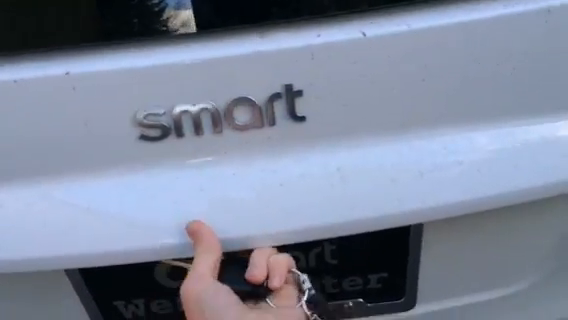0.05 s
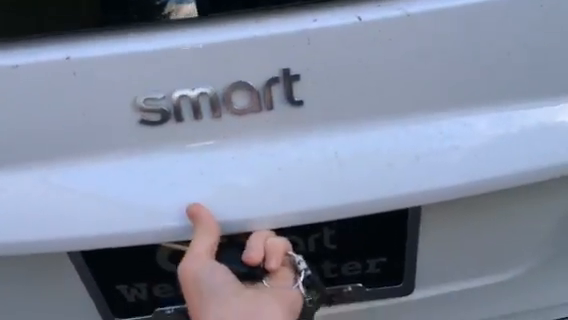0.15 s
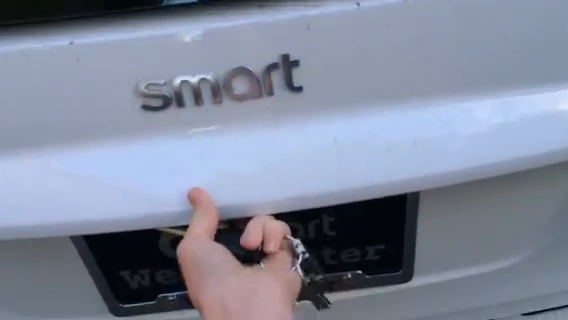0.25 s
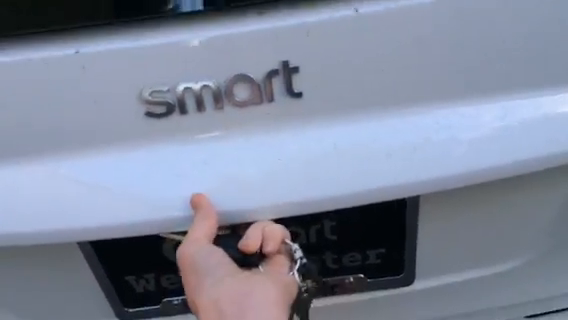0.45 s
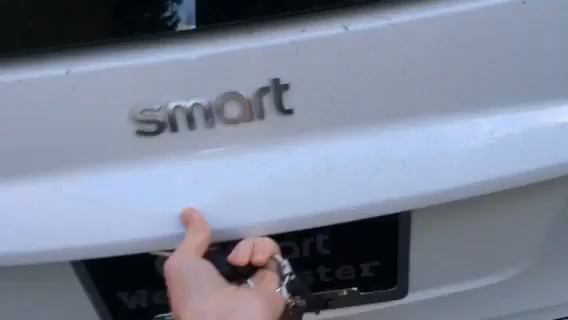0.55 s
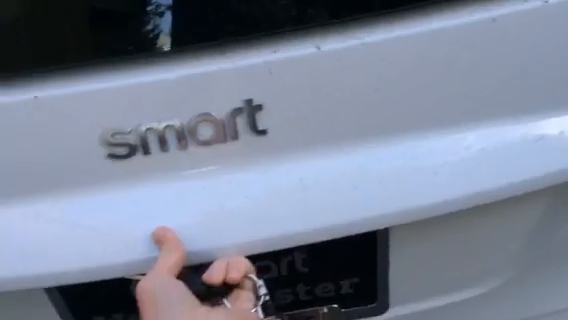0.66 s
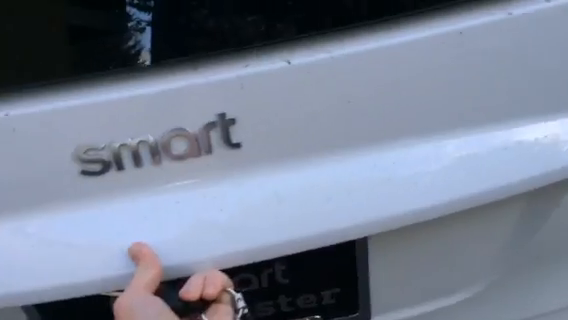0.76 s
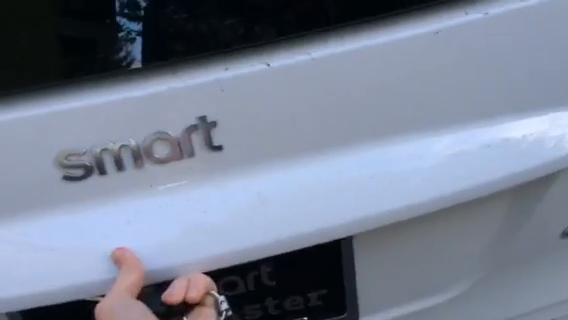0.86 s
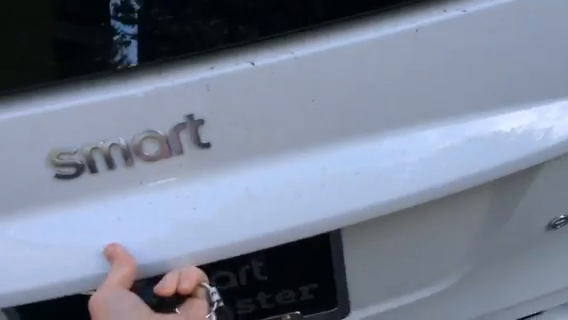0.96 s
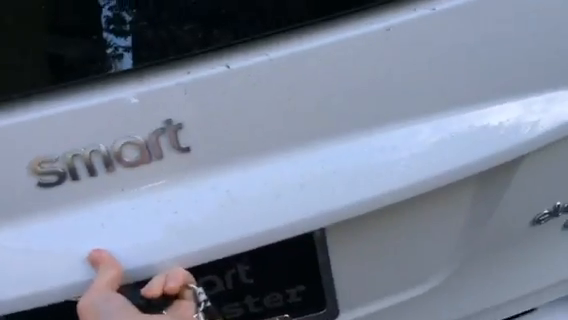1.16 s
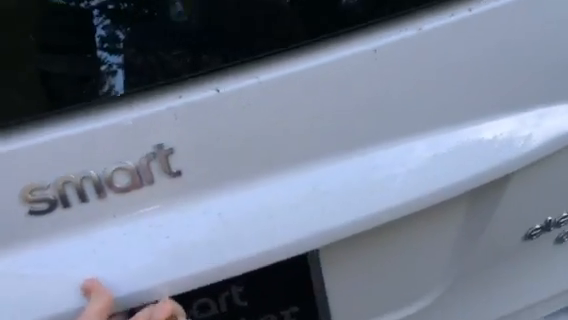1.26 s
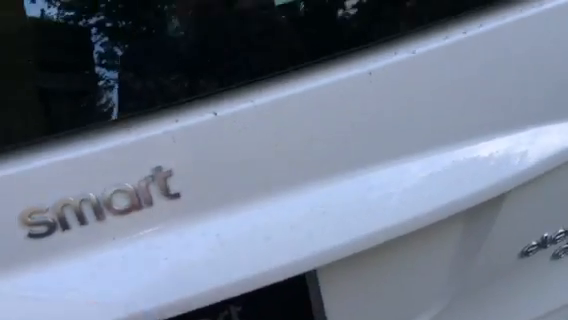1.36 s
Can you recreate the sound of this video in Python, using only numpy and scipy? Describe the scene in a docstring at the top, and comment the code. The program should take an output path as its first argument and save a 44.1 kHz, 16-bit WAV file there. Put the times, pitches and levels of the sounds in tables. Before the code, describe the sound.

A car's rear hatch latch releases close by, outdoors. A button clicks at about 0.15 seconds as keys jingle lightly. A small motor whirs from 0.2 to 0.4 seconds, and the latch lets go with a loud clunk at 0.3. After a pause, the gears whine and rattle back from 0.7 to 1.1 seconds, knocking near 0.9 and 1.1. Faint key ticks follow over a quiet, distant rumble.

```python
"""A small geared motor whirs as it releases the latch of a car's rear hatch, outdoors.
A button clicks, the motor pulls, and the latch lets go with a clunk that excites the panel's modes.
The gears spin back, whining at harmonics of their speed while their teeth rattle in the housing,
then knock on their stop, rebound and settle. Keys in the pressing hand collide and jingle faintly.
Nearby walls and ground scatter the sound, over a distant rumble."""
import sys
import numpy as np
from scipy import signal
from scipy.fft import rfft, irfft, next_fast_len
from scipy.io import wavfile

SR = 44100
rng = np.random.default_rng(int(sys.argv[2]) if len(sys.argv) > 2 else 0)


def bounce(signal):
    """Save signal as a 16-bit WAV file at the path given by the first command-line argument."""
    frames = np.transpose(np.atleast_2d(signal))
    limited = np.clip(frames, -1, 1)
    pcm = np.round(limited * 32767).astype(np.int16)
    wavfile.write(sys.argv[1], SR, pcm)


N = 61739
T = np.arange(N) / SR

# harmonics of the gear rotation: order, pulling_db, returning_db
GEAR_HARMONICS = [(1, -22, -10), (2, -18, -4), (3, -20, -6), (4, -6.5, -11), (5, -19, -31), (6, -5, 1.5),
                  (7, -23, -9), (12, 1.5, -2), (17, -15, -20), (18, -4, -4.5), (23, -9, -10.5)]
# modes of the gear housing: pitch_hz, level_db, t60_s
HOUSING_MODES = [(244, -8.5, 0.037), (590, -12, 0.037), (786, -37, 0.035), (980, -13.5, .03),
                 (1254, -9, 0.064), (1658, 0.5, 0.05), (1830, -0.5, 0.011), (3335, -15.5, 0.072),
                 (5520, -24, 0.035), (6600, -34, .04)]
# spectrum of a latch or button impact: frequency_hz, level_db
IMPACT_SPECTRUM = [(100, -6), (330, 10), (650, -13), (1050, -4), (2400, 0.5), (3700, -6.5), (5400, -9),
                   (6500, -21.5), (9000, -27.5), (15000, -36)]


def gear_return():
    """Forced vibration: the unloaded gears' harmonics swell as they sweep through housing resonances."""
    # spin-back and rebound: time_s, rotation_hz
    speed = [(.724, 104.8), (.757, 163.2), (.79, 237), (.804, 270.4), (.819, 280.2), (.83, 307.7),
             (.85, 341.1), (.878, 372.3), (.92, 365.3), (.938, 314.8), (.99, 191.2), (1.025, 262),
             (1.044, 322.2), (1.056, 365), (1.072, 278.8), (1.12, 224.8)]
    # gear envelope: time_s, level_db
    envelope = [(.721, -78), (.729, -34.5), (.745, -41), (.758, -34), (.792, -37), (.810, -31.5),
                (.875, -31), (.905, -34.5), (.942, -35.5), (.968, -60.5), (.995, -62.5), (1.033, -42.5),
                (1.041, -41), (1.056, -39.5), (1.075, -41.5), (1.09, -48.5), (1.101, -43), (1.122, -64)]
    # the gears sing when speeding up and clatter when slack: time_s, whine_gain_db
    whine_balance = [(.73, -7.5), (.765, 4), (.81, -2), (.835, 0), (.855, -8), (.885, 2), (.925, -16),
                     (.938, 1), (.955, -6), (1.03, -3), (1.041, 8.5), (1.052, -4)]
    # radiation of the tones by the housing: frequency_hz, gain_db
    radiation = [(100, -21), (700, -10.5), (1230, -8.5), (1480, -23.5), (1640, 2.5), (1900, -3.5),
                 (2060, -2.5), (2250, -17), (3300, -8), (4400, -15), (7000, -15), (9000, -33)]
    # rattle of free-running teeth: frequency_hz, level_db
    rattle_spectrum = [(50, -8), (150, -2), (300, 2), (430, -2), (600, 0), (1000, -1.5), (1450, -5),
                       (1900, -2.5), (2500, -8.5), (3200, -3), (4400, -12.5), (6800, -19.5), (9000, -30),
                       (15000, -31.5)]
    tones, teeth = gear_train(speed, [(order, db) for order, _, db in GEAR_HARMONICS])
    level = from_db(curve(envelope)) * (T > envelope[0][0]) * (T < envelope[-1][0])
    housing = sum((-1) ** k * from_db(db) * ring(teeth, hz, t60)
                  for k, (hz, db, t60) in enumerate(HOUSING_MODES))
    whine = from_db(-12) * colour(level * from_db(curve(whine_balance)) * tones, radiation)
    rattle = from_db(-3.5) * colour(level * teeth, rattle_spectrum)
    return whine + rattle + from_db(-8) * level * rms_one(housing)


def motor_pull():
    """Periodic forcing: the whine's pitch follows the speed of the motor as it draws the latch back."""
    # speed under load: time_s, rotation_hz
    speed = [(.205, 134.7), (.221, 149.7), (.228, 216.2), (.237, 236.9), (.265, 244.1), (.287, 246.6),
             (.304, 254.8), (.335, 247.4), (.365, 237.8), (.39, 231.2)]
    # drive envelope: time_s, level_db
    envelope = [(.202, -91), (.209, -37.5), (.235, -32), (.28, -32.5), (.335, -32), (.36, -35.5),
                (.39, -32.5), (.403, -51), (.425, -74)]
    # response of the loaded drive: frequency_hz, gain_db
    response = [(25, -24), (70, -2), (150, 1), (300, 3.5), (650, -8.5), (1000, -1), (1750, -1.5),
                (2350, -12), (2950, -4.5), (3700, -6.5), (4800, -21), (5600, -13.5), (8000, -30.5),
                (15000, -39.5)]
    tones, teeth = gear_train(speed, [(order, db) for order, db, _ in GEAR_HARMONICS])
    level = from_db(curve(envelope)) * (T > envelope[0][0]) * (T < envelope[-1][0])
    return colour(level * (from_db(-13) * tones + from_db(-3) * teeth), response)


def gear_train(speed, harmonics, teeth_per_turn=6, jitter=.009, flutter_db=3, spread_db=3):
    """Gear meshing: rotation gives a harmonic series, uneven tooth impacts a broadband rattle."""
    turns = np.cumsum(curve(speed) * (1 + jitter * drift(130))) / SR
    tones = np.zeros(N)
    for order, db in harmonics:
        amplitude = from_db(db + flutter_db * (drift(43) - 1)) * np.sqrt(2)
        tones += amplitude * np.sin(2 * np.pi * (order * turns + rng.random()))
    meshes = np.diff(np.floor(teeth_per_turn * turns), prepend=0)
    impacts = meshes * from_db(spread_db * rng.standard_normal(N)) * rng.choice([-1, 1], N)
    hiss = from_db(-2.5) * rng.standard_normal(N)
    return tones, rms_one(rms_one(impacts) + hiss)


def latch():
    """Free vibration: the released hatch rocks on its elastic seal; the claw's first contact rings it."""
    # metal contacts of the opening claw: start_s, level_db
    contacts = [(.2928, -21), (.2955, -16.5), (0.2984, -18.5), (0.3035, -26)]
    # modes of hatch and latch: pitch_hz, level_db, t60_s
    hatch_modes = [(110, -13, 0.22), (242.7, 3.5, .11), (523, -1.5, 0.1), (795.4, -9.5, 0.087),
                   (971, -8.5, 0.065), (1073, -1.5, 0.041), (1260, -6.5, 0.089), (1308, -3.5, 0.061),
                   (1507, -23, 0.088), (1705, -8, 0.064), (2048, -8.5, 0.076), (2480, -11, 0.061),
                   (3740, -8.5, 0.039), (8630, -18, 0.018)]
    # oscillations on the seal: start_s, level_db, pitch_hz, t60_s
    heaves = [(0.2838, -14, 94.5, 0.046), (0.282, -22, 65.5, 0.058), (0.295, -17.5, 209, 0.064),
              (0.318, -25.5, 165, 0.062), (.35, -39, 38.3, 0.27), (.386, -31, 325.7, 0.14)]
    start_s, crack_db = np.transpose(contacts)
    heave = sum(ring(clicks(at, db), hz, t60) for at, db, hz, t60 in heaves)
    panel = strike(start_s[:1], -15.5, hatch_modes, spread_db=2.5)
    return heave + panel + crack(start_s, crack_db, IMPACT_SPECTRUM, t60_s=0.015)


def knocks():
    """Impact excitation: gears hitting their stop thump the panel and ring the housing."""
    # blows on the stop: start_s, thump_db, thump_hz, ring_db, crack_db
    blows = [(0.7397, -29.5, 280, -55, -38), (.752, -27, 366, -56, -42), (0.8882, -19, 266, -45, -36),
             (0.892, -31, 236, -26, -23.5), (1.0675, -20, 219, -33.5, -29.5), (1.072, -45, 239, -25, -38),
             (1.155, -41.5, 230, -44, -38.5), (1.160, -44.5, 300, -45.5, -39.5)]
    # a knock inside the closed hatch: frequency_hz, level_db
    spectrum = [(60, -5), (170, 4.5), (350, 8), (600, 0), (1000, 4), (1400, -4), (1850, 5.5), (2400, -12),
                (3100, -1.5), (4400, -18), (7000, -24.5), (9000, -35), (15000, -29)]
    start_s, _, _, ring_db, crack_db = np.transpose(blows)
    thumps = sum(ring(clicks(at, db), hz, t60_s=0.036) for at, db, hz, _, _ in blows)
    thumps = signal.sosfilt(signal.butter(1, 90, "high", fs=SR, output="sos"), thumps)
    housing = strike(start_s, ring_db, HOUSING_MODES, spread_db=0)
    return housing + crack(start_s, crack_db, spectrum, t60_s=0.043) - thumps


def button():
    """Friction and snap action: fingers slide onto the button and its plastic switch snaps over."""
    # switch contacts: start_s, level_db
    snaps = [(.163, -29.5), (0.1658, -32.5), (0.1732, -55)]
    # modes of the button: pitch_hz, level_db, t60_s
    modes = [(344, -3, 0.062), (645, 1, 0.016), (1950, 0, 0.032), (2320, 5, 0.0062), (2780, -5, 0.013),
             (4530, -16, 0.1)]
    # envelope of the finger friction: time_s, level_db
    slide = [(0, -69), (.06, -77), (.105, -65), (.135, -56.5), (.16, -61), (.195, -57), (.21, -72)]
    # friction noise: frequency_hz, level_db
    slide_spectrum = [(200, 1), (1000, -6), (1900, -0.5), (3300, -13), (4700, -0.5), (6000, -13),
                      (15000, -24)]
    start_s, db = np.transpose(snaps)
    level = from_db(curve(slide) + 3.9 * drift(70)) * (T < slide[-1][0])
    friction = colour(level * rng.standard_normal(N), slide_spectrum)
    plastic = strike(start_s, db - 3.5, modes, spread_db=1.5)
    return friction + plastic + crack(start_s, db, IMPACT_SPECTRUM, t60_s=0.0094)


def keys(bounces=2, bounce_s=0.013, bounce_db=-12):
    """Collisions ring the high modes of small metal keys; each sets off lighter ones among the rest."""
    # key collisions: start_s, ring_db, tick_db
    touches = [(0.0157, -58, -47), (0.096, -66, -58), (.118, -72, -67), (.129, -72, -53),
               (0.137, -60, -48.5), (.1496, -35, -37), (0.161, -43, -44), (.172, -36.5, -31.5),
               (.176, -46, -37), (.193, -59, -57), (0.207, -31.5, -33), (0.221, -49, -39),
               (0.2432, -40.5, -38), (0.4384, -77, -48.5), (0.4617, -63, -55), (0.611, -70, -64),
               (0.691, -84, -61), (1.0937, -55, -54.5), (1.1997, -61, -57), (1.374, -61, -63),
               (1.393, -58, -52)]
    # modes of the keys: pitch_hz, level_db, t60_s
    modes = [(7720, -10.5, 0.081), (10800, -19, .06), (11560, -0.5, 0.058), (11730, -15.5, 0.064),
             (13288, -3.5, 0.078), (13830, -16, 0.037), (14500, -21, 0.032)]
    # contact tick: frequency_hz, level_db
    spectrum = [(800, -13), (3000, -1.5), (4600, 0), (6000, -7.5), (7600, -0.5), (9500, -5.5),
                (11600, -0.5), (14500, -11), (16000, 2.5)]
    start_s, ring_db, tick_db = np.transpose(touches)
    later_s = start_s[:, None] + bounce_s * rng.uniform(0.32, 2, (len(start_s), bounces))
    start_s = np.append(start_s, later_s)
    ring_db = np.append(ring_db, np.repeat(ring_db, bounces) + bounce_db)
    tick_db = np.append(tick_db, np.repeat(tick_db, bounces) + bounce_db)
    jingle = strike(start_s, ring_db - 1, modes, spread_db=2)
    return jingle + crack(start_s, tick_db - 1, spectrum, t60_s=0.03)


def reflections(direct, delay_s=0.019, t60_s=0.23, cutoff_hz=3550, level_db=-22.5):
    """Scattering: nearby walls and ground return a faint, dull tail after the direct sound."""
    tail = rng.standard_normal(N) * from_db(-60 * T / t60_s) * (T > delay_s)
    tail = signal.sosfilt(signal.butter(2, cutoff_hz, fs=SR, output="sos"), tail)
    return from_db(level_db) * signal.fftconvolve(direct, tail / np.linalg.norm(tail))[:N]


def distant_rumble(level_db=-52.5, swell_db=0.3):
    """Ambient noise: a nearly steady outdoor background with its power at low frequencies."""
    # outdoor rumble: frequency_hz, level_db
    spectrum = [(20, -1), (40, -13.5), (65, -3.5), (140, 1), (230, -9), (350, -13.5), (600, -17.5),
                (1000, -16), (1800, -24), (3000, -34), (7000, -43.5), (15000, -46)]
    return from_db(level_db + swell_db * drift(20)) * colour(rng.standard_normal(N), spectrum)


def strike(start_s, db, modes, spread_db):
    """Modal superposition: each blow rings every mode, its strength scattered by spread_db."""
    scatter_db = spread_db * rng.standard_normal((len(start_s), len(modes)))
    return sum((-1) ** k * ring(clicks(start_s, db + mode_db + scatter_db[:, k]), hz, t60)
               for k, (hz, mode_db, t60) in enumerate(modes))


def crack(start_s, db, spectrum, t60_s):
    """Incoherent summation: each blow's dense rattle is noise whose power adds and dies exponentially."""
    decay = from_db(-120 / (t60_s * SR))
    power = signal.lfilter([1], [1, -decay], clicks(start_s, 2 * db) + 1e-18)
    return colour(np.sqrt(power) * rng.standard_normal(N), spectrum)


def ring(force, hz, t60_s):
    """Damped oscillator: a unit impulse starts a decaying sine of height 1."""
    r, w = from_db(-60 / (t60_s * SR)), 2 * np.pi * hz / SR
    return signal.lfilter([0, np.sin(w)], [1, -2 * r * np.cos(w), r * r], force + 1e-18)


def clicks(start_s, db):
    """One impulse at each start time."""
    impulses = np.zeros(N)
    np.add.at(impulses, np.clip(np.atleast_1d(start_s) * SR, 0, N - 1).astype(int), from_db(db))
    return impulses


def colour(x, spectrum):
    """Minimum-phase filter of the given spectral shape; white noise keeps its power."""
    size = 2 * next_fast_len(N)
    hz, db = np.transpose(spectrum)
    bin_hz = np.arange(size // 2 + 1) * SR / size
    gain = rms_one(from_db(np.interp(np.log(bin_hz + 1), np.log(hz), db)))
    cepstrum = irfft(np.log(gain))
    cepstrum[1:size // 2] *= 2  # folding the cepstrum makes the filter causal
    cepstrum[size // 2 + 1:] = 0
    return irfft(rfft(x, size) * np.exp(rfft(cepstrum)))[:N]


def drift(rate_hz):
    """Low-passed noise: a smooth random wander of unit power."""
    r = np.exp(-2 * np.pi * rate_hz / SR)
    return rms_one(signal.lfilter([1], [1, -2 * r, r * r], rng.standard_normal(2 * N))[N:])


def curve(rows):
    """Linear interpolation between (time_s, value) points."""
    return np.interp(T, *np.transpose(rows))


def rms_one(x):
    """Scale to unit power."""
    return x / np.sqrt(np.mean(x ** 2) + 1e-20)


def from_db(db):
    """Decibels to amplitude ratio."""
    return 10 ** (np.asarray(db) / 20)


def scene():
    """Superposition: the nearby mechanism and keys, their reflections and the rumble add in one channel."""
    direct = button() + motor_pull() + latch() + gear_return() + knocks() + keys()
    rumble = distant_rumble()
    return (direct + reflections(direct) + rumble)[None]


def record(dry, low_hz=28, high_hz=15400):
    """Band limiting: the microphone drops the deepest bass, and the top is cut steeply."""
    thin = signal.sosfilt(signal.butter(2, low_hz, "high", fs=SR, output="sos"), dry)
    return signal.sosfilt(signal.ellip(10, .3, 80, high_hz, fs=SR, output="sos"), thin)


dry = scene()
out = record(dry)
bounce(out)
```